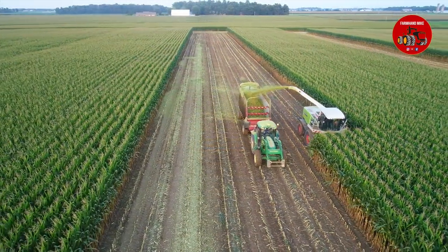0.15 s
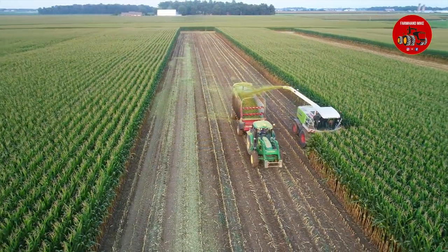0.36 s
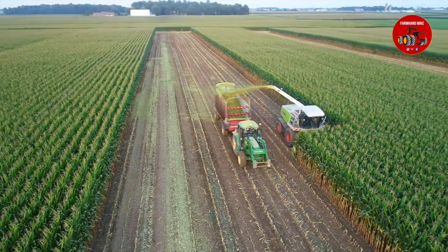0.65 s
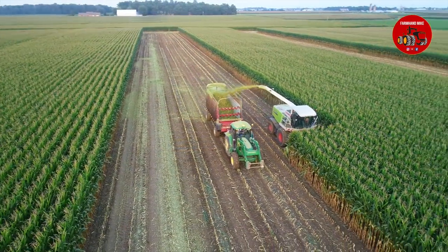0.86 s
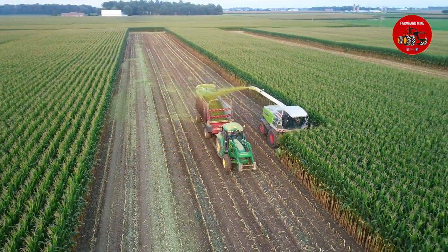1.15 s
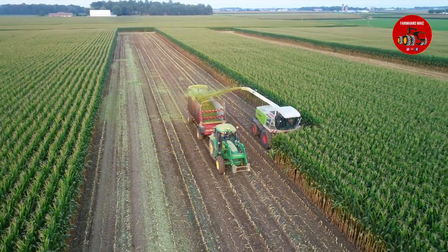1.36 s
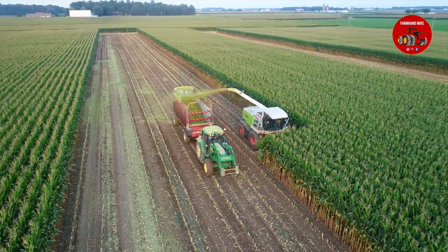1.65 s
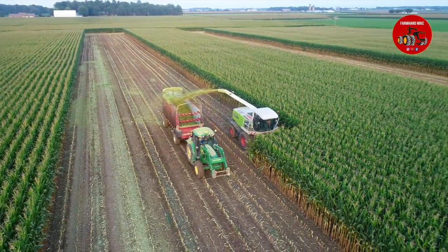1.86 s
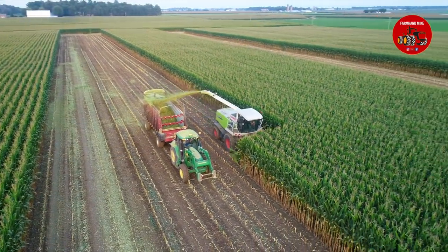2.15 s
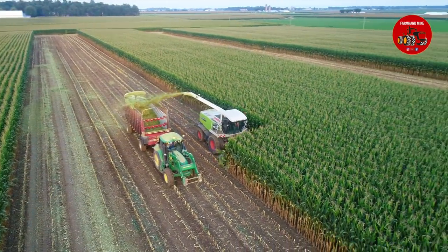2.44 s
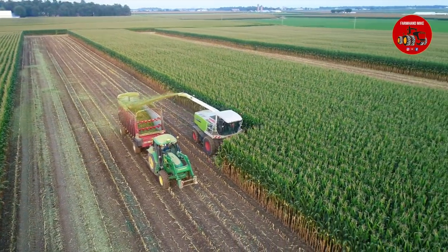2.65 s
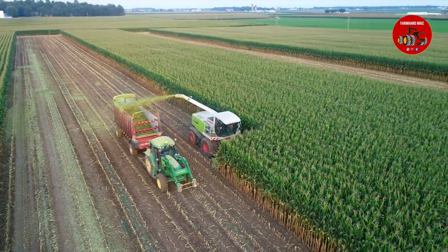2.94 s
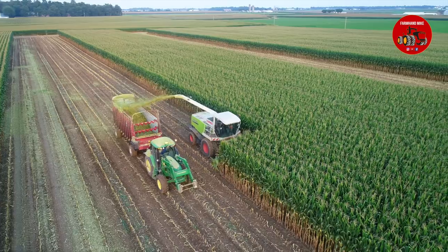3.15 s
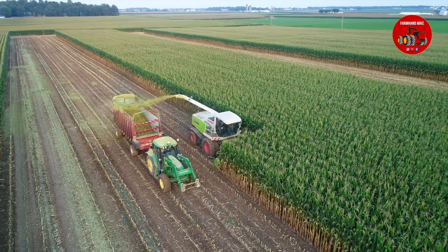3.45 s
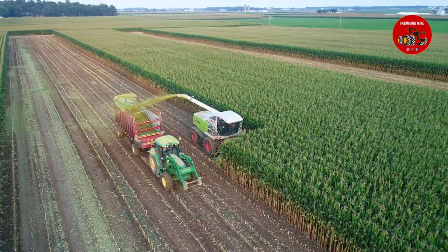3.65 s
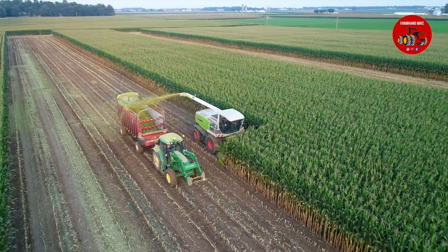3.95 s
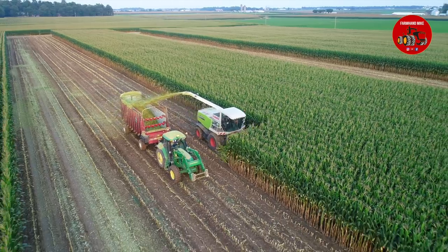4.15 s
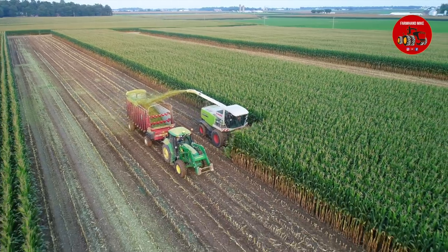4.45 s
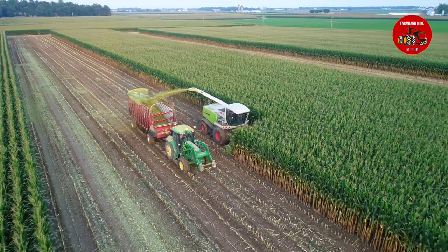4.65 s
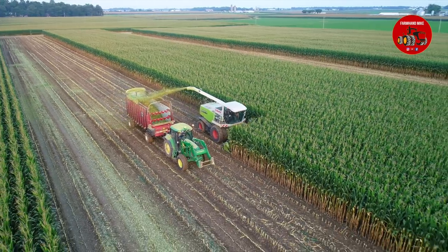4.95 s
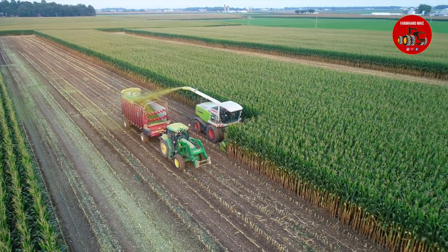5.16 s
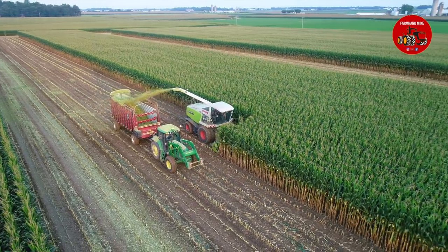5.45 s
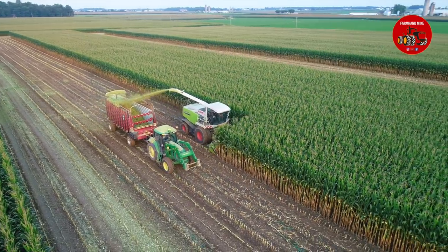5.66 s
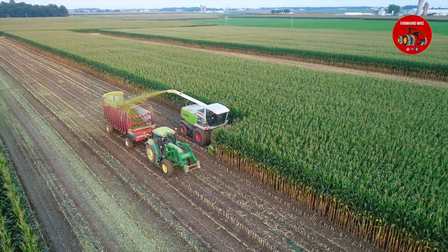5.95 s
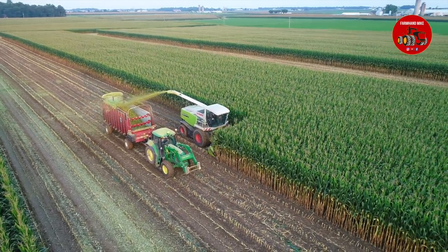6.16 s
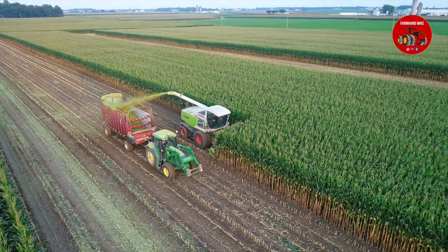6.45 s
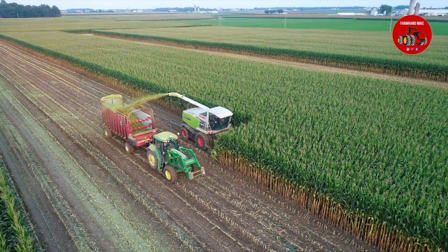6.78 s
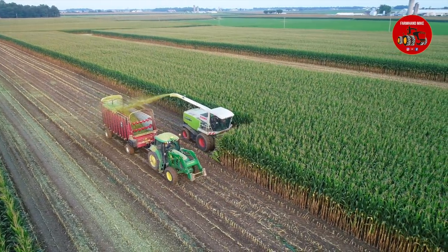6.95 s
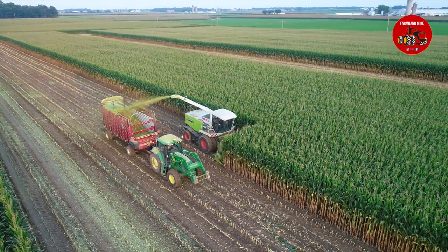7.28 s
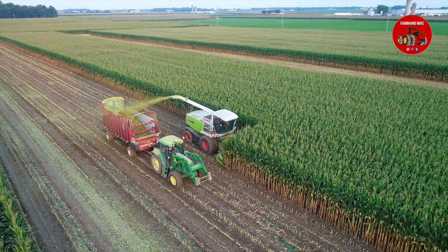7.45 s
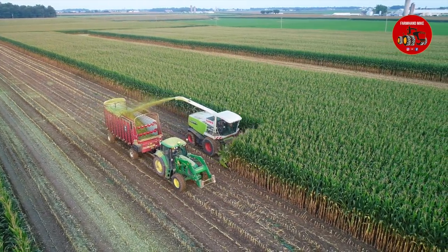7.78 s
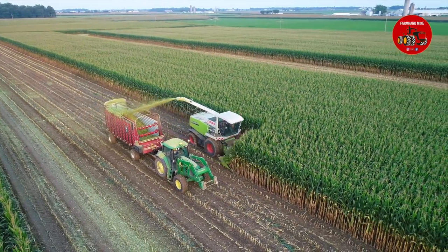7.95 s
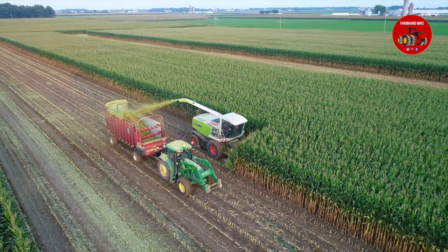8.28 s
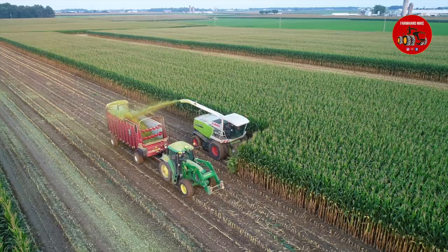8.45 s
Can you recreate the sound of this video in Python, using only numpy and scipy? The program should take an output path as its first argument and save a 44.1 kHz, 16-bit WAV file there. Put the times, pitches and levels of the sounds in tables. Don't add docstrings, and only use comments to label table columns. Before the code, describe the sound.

A forage harvester works through standing corn at steady load. Deep diesel beats and exhaust rumble sit beneath a thick hum from knife drum, blower and rollers, with rattling panels and broad fan roar. A bright rush of chopped leaves and stalks sweeps by early, then fades. Pitch wavers slightly and sinks near the end. Outdoor, dry, nearly mono, dense and slightly limited.

```python
import sys
import numpy as np
from scipy import signal
from scipy.fft import rfft, irfft, next_fast_len
from scipy.io import wavfile
from scipy.ndimage import uniform_filter1d, minimum_filter1d

SR = 44100
rng = np.random.default_rng(int(sys.argv[2]) if len(sys.argv) > 2 else 0)


def digitize_waveform(pressure):
    field = np.atleast_2d(pressure).T
    bounded = np.clip(field, -1, 1)
    quanta = np.round(bounded * 32767).astype(np.int16)
    wavfile.write(sys.argv[1], SR, quanta)


def ratio_of_db(decibels):
    return 10 ** (np.asarray(decibels, float) / 20)


N = 380141
SECONDS = np.arange(N) / SR


def rms_one(x):
    return x / np.sqrt(np.mean(x ** 2) + 1e-20)


def drift(rate):
    every = 80
    r = np.exp(-2 * np.pi * rate * every / SR)
    noise = rng.standard_normal(N // every + 1002)
    slow = signal.lfilter([1], [1, -2 * r, r * r], noise)[1000:]
    return np.interp(np.arange(N) / every, np.arange(len(slow)), rms_one(slow))


def coloured(x, points):
    size = next_fast_len(N)
    hz, db = np.transpose(sorted(points))
    bins = np.arange(1, size // 2 + 2) * SR / size
    gain_db = np.interp(np.log(bins), np.log(hz), db, -120, -120)
    return rms_one(irfft(rfft(x, size) * ratio_of_db(gain_db), size)[:N])


def hiss(points):
    return coloured(rng.standard_normal(N), points)


def patchy(low_hz, together, own_db, own_rate):
    size = next_fast_len(N)
    white = rfft(rng.standard_normal(size))
    place = 2 * np.log2(np.arange(1, len(white) + 1) * SR / size / low_hz)
    place = np.clip(place, 0, 7)
    out = 0
    for k in range(8):
        window = np.clip(1 - np.abs(place - k), 0, 1)
        flicker_db = together + own_db * drift(own_rate)
        out = out + irfft(white * window, size)[:N] * ratio_of_db(flicker_db)
    return out


def tone(turns, level_db, blur):
    phase = 2 * np.pi * (turns + rng.random()) + blur * drift(2.6)
    return np.sqrt(2) * ratio_of_db(level_db) * np.sin(phase)


def stack(turns, ratios, levels_db, flutter_db, blur):
    tones = 0
    for ratio, db in zip(ratios, levels_db):
        tones = tones + tone(ratio * turns, db + flutter_db * drift(5.1), blur * ratio)
    return tones


def swell(s, at, width, height):
    return height * np.exp(-.5 * ((s - at) / width) ** 2)


# (name, t/s, width/s, level/dB)
CROP_SWELLS = [("third", 3.0, .3, -1), ("third", 4.0, 0.13, 1.9), ("sixth", 1, 0.23, -2),
               ("sixth", 3, 0.16, -2), ("sixth", 5.4, .3, -2.4), ("ninth", 0.68, 0.38, -6),
               ("ninth", 2.7, 0.25, -4), ("ninth", 4.37, 0.15, -8), ("ninth", 5.5, 0.16, -3),
               ("twelfth", 1.2, .6, 5), ("twelfth", 6.6, .6, -12), ("pass", .25, .4, 4.8),
               ("pass", 1.2, .25, -3), ("pass", 5.61, 0.24, 3.5), ("pass", 6.5, 0.084, -6),
               ("pass", 3.56, 0.27, 1.5), ("octave", 1.47, 0.22, 8.9), ("octave", 0.34, 0.2, 6.5),
               ("octave", 7.64, .3, 6), ("edge", 1.32, 0.37, -8), ("edge", 7.77, 0.17, -9),
               ("edge", 5.75, 0.078, 4.8), ("ring", 8.35, 0.28, 5.5), ("blower", 1.95, 0.59, -5.5),
               ("blower", 3.6, 0.27, -2.5), ("blower", 4.7, 0.45, 3.8), ("feed", 1.23, 0.47, 8),
               ("feed", 5.4, 0.39, 3.5), ("header", 3.7, 0.24, -8), ("header", 6.4, 0.26, -8)]
# (name, t/s, width/s, level/dB)
GEAR_SWELLS = [("whine", .42, .06, 6), ("whine", .95, 0.17, 4), ("whine", 1.36, 0.093, 8.7),
               ("whine", 2.4, 0.17, 5), ("whine", 3.4, 0.14, 6.4), ("whine", 4.4, .1, 4.5),
               ("whine", 4.22, 0.052, 6), ("whine", 5.53, 0.21, 7.6), ("whine", 6.02, 0.055, 7),
               ("whine", 6.7, .1, 4), ("whine", 7.18, .06, 5)]


def levels(rows, excess_hz):
    ticks = np.arange(0, N + 400, 400)
    result = []
    for name, db, slope, wander_db in rows:
        swells = np.zeros(len(ticks))
        for who, at, width, gain_db in CROP_SWELLS + GEAR_SWELLS:
            if who == name:
                swells += swell(ticks / SR, at, width, gain_db)
        swell_db = np.interp(np.arange(N), ticks, swells)
        result.append(db + slope * excess_hz + wander_db * drift(2.5) + swell_db)
    return result


# (name, level/dB at rated speed, slope/dB per Hz of speed, wander/dB)
EXHAUST_TONES = [("third", -22.5, 0.33, 1), ("sixth", -21.5, -0.2, 1), ("ninth", -24.5, 0.01, 0.99),
                 ("twelfth", -32.5, 0.68, 2.4)]
EXHAUST_BEATS = [3, 6, 9, 12]
# (beats per engine cycle, level/dB)
WEAK_BEATS = [(4, -39), (7, -35), (10, -32), (18, -42), (26, -56), (30, -56.5)]


def engine(turns, excess_hz):
    cycles = .07019 * turns
    strong_db = levels(EXHAUST_TONES, excess_hz)
    strong = stack(cycles, EXHAUST_BEATS, strong_db, flutter_db=1.0, blur=0.01)
    return strong + stack(cycles, *np.transpose(WEAK_BEATS), flutter_db=4.0, blur=0.016)


# (name, level/dB at rated speed, slope/dB per Hz of speed, wander/dB)
DRUM_TONES = [("pass", -24.5, 0.061, 1), ("octave", -47.5, 0.31, 1.7), ("edge", -39, 0.5, 0.77),
              ("ring", -50.5, -0.017, 1.6)]
DRUM_GEARING = [1.001, 2.002, 3.003, 4.004]


def knife_drum(turns, excess_hz):
    return stack(turns, DRUM_GEARING, levels(DRUM_TONES, excess_hz), flutter_db=.5, blur=.1)


# (name, level/dB at rated speed, slope/dB per Hz of speed, wander/dB)
ROLLER_TONES = [("blower", -24.5, 0.34, 1.7), ("feed", -28.5, .01, 1.9), ("header", -27, -0.24, 1.5),
                ("cracker", -41.5, -0.62, 2.3)]
ROLLER_GEARING = [.6656, .4691, .5693, 1.3616]
SHAFT_GEARING = [.1897, .2344, .759, 1.1, 3.6436]
SHAFT_LEVELS = [-36.5, -36.5, -39.5, -45, -57]


def rollers(turns, excess_hz):
    loud = stack(turns, ROLLER_GEARING, levels(ROLLER_TONES, excess_hz), flutter_db=0.76, blur=0.17)
    return loud + stack(turns, SHAFT_GEARING, SHAFT_LEVELS, flutter_db=2.5, blur=0.48)


# (name, level/dB at rated speed, slope/dB per Hz of speed, wander/dB)
GEAR_TONES = [("whine", -46.5, .5, 0.81)]


def gearbox(turns, excess_hz):
    whine_db = levels(GEAR_TONES, excess_hz)[0] + 3 * drift(18.0)
    teeth_per_pass = 10.94
    return stack(turns, [teeth_per_pass], [whine_db], flutter_db=.5, blur=.2)


# (f/Hz, level/dB)
RUMBLE_COLOUR = [(18, -22), (30, -10), (60, -2), (108, -2), (200, -0.5), (262, -0.5), (300, -7), (330, -18),
                 (350, -24), (385, -20.5), (410, -17.5), (500, -20), (535, -26.5), (610, -33.5)]


def rumble(excess_hz):
    return ratio_of_db(-23 + 0.05 * excess_hz) * hiss(RUMBLE_COLOUR)


# (f/Hz, level/dB)
CASING_COLOUR = [(540, -40), (600, -8), (635, -3.5), (700, -2), (769, -1.5), (853, 1), (960, -3),
                 (1020, -8), (1120, -21.5), (1200, -10), (1290, -4), (1500, -8), (1950, -23)]


def casing(gust):
    return ratio_of_db(-36 + 0.75 * gust + 0.52 * drift(2.4)) * hiss(CASING_COLOUR)


# (f/Hz, level/dB)
ROAR_COLOUR = [(760, -43), (1300, -12), (1500, -3.5), (2380, -5), (2560, -7.5), (2730, -6), (3500, -11),
               (4550, -12.5), (6910, -9), (7350, -12), (9440, -32), (10200, -32), (10900, -31),
               (11500, -34), (15800, -52)]


def roar(excess_hz, gust):
    churn = patchy(1270, gust, own_db=0.23, own_rate=12.0)
    return ratio_of_db(-29.5 + 0.06 * excess_hz) * coloured(churn, ROAR_COLOUR)


# (f/Hz, level/dB)
STALK_COLOUR = [(1100, -19), (1500, -2), (2500, -0.5), (4000, 2), (5000, -5.5), (6000, -36)]
# (f/Hz, level/dB)
LEAF_HISS_COLOUR = [(3000, -30), (4000, -0.5), (5000, 3), (6200, 3.5), (7200, 2), (8500, -10.5),
                    (10000, -25), (11000, -50)]
# (closest t/s, level/dB there, loss/dB one second off)
STALKS_GO_BY = (0.51, -27.5, 3.5)
# (closest t/s, level/dB there, loss/dB one second off)
LEAVES_GO_BY = (0.59, -26, 13.4)
# (t/s, width/s, level/dB)
CROP_PUFFS = [(.06, 0.045, -33), (.215, .012, -26), (.27, .03, -29), (.35, .02, -28), (.615, 0.02, -25),
              (.64, .008, -24), (.82, 0.027, -30.5), (.98, .03, -33), (1.1, .02, -32), (1.24, 0.015, -27),
              (1.5, 0.055, -35)]
# (f/Hz, level/dB)
PUFF_HISS_COLOUR = [(3500, -23), (5000, -1), (6500, 4.5), (8000, -8.5), (9500, -21), (10500, -32),
                    (12000, -45)]


def passing_db(at, db, loss_db):
    return db - loss_db * (SECONDS - at) ** 2


def spray():
    grains = patchy(1200, .6 * drift(30.0), own_db=.9, own_rate=14.0)
    stalks = ratio_of_db(passing_db(*STALKS_GO_BY)) * coloured(grains, STALK_COLOUR)
    leaves = ratio_of_db(passing_db(*LEAVES_GO_BY)) * coloured(grains[::-1], LEAF_HISS_COLOUR)
    puffs = sum(swell(SECONDS, at, width, ratio_of_db(db)) for at, width, db in CROP_PUFFS)
    return ratio_of_db(.7 * drift(25.0)) * (stalks + leaves) + puffs * hiss(PUFF_HISS_COLOUR)


# (f/Hz, level/dB)
AIR_COLOUR = [(6060, -52), (10300, -16), (11600, -9), (12200, 3), (14100, -5), (15100, -4), (15800, -2)]
AIR_LEVELS = (-55.5, -53.5)


def air():
    own = np.array([hiss(AIR_COLOUR) * ratio_of_db(db + .6 * drift(4.0)) for db in AIR_LEVELS])
    opposed = ratio_of_db(-59) * hiss([(13500, -20), (14300, -2), (15800, 0)])
    return own + opposed * [[.6], [-1]]


# (start t/s, end t/s, level/dB)
PARTING_MOMENTS = [(0.492, .56, -49), (0.786, 0.957, -47), (1.467, 1.86, -56), (2.181, 2.385, -48.5),
                   (2.84, 2.88, -58), (3.494, 3.603, -49), (3.9, 4.014, -54), (4.71, 4.94, -51),
                   (5.225, 5.277, -56), (6.27, 6.39, -62), (7.41, 7.905, -55.5), (8.404, 8.57, -58)]
# (f/Hz, level/dB)
PARTING_SOUND = [(60, 9), (300, 4), (1000, 4), (3000, 0.5), (8000, -4), (9500, -10), (10500, -30)]


def partings():
    gate = sum(ratio_of_db(db) * ((SECONDS > start) & (SECONDS < end)) for start, end, db in PARTING_MOMENTS)
    patches = patchy(173, 1.3 * drift(5.2), own_db=6.5, own_rate=6.9)
    return gate * coloured(patches, PARTING_SOUND) * [[1], [-1]]


def turbo():
    s = SECONDS - 1.4
    hz = 10885 - 400 * np.exp(-s / .75)
    hz = hz + 46 * drift(55.0) + 12 * drift(2.0)
    level_db = -64.5 + 0.36 * s + 3 * drift(15.0)
    fade_in = np.clip(s / .3, 0, 1)
    return fade_in * tone(np.cumsum(hz) / SR, level_db, .3)


# (t/s, knife passes f/Hz)
DRIVE_SPEED = [(0, 236.4), (.4, 236.2), (1.0, 239.6), (1.4, 241.2), (1.7, 240), (2.2, 235.8), (2.6, 237.2),
               (3.3, 235), (4.0, 239), (4.55, 233.2), (4.95, 234.6), (5.5, 239), (6.1, 235.4), (6.7, 235.3),
               (7.35, 233.2), (7.75, 228.2), (8.2, 226.3), (8.62, 225.5)]


def scene():
    rated_hz, flywheel_s = 236.5, .2
    speed = np.interp(SECONDS, *np.transpose(DRIVE_SPEED))
    speed = uniform_filter1d(speed, size=int(flywheel_s * SR))
    turns = np.cumsum(speed) / SR
    excess_hz = speed - rated_hz
    gust = 0.19 * drift(17.0) + 0.55 * drift(20.0)
    driven = engine(turns, excess_hz) + knife_drum(turns, excess_hz)
    driven = driven + rollers(turns, excess_hz) + gearbox(turns, excess_hz)
    noises = rumble(excess_hz) + casing(gust) + roar(excess_hz, gust)
    close = np.clip((N - np.arange(N)) / (.004 * SR), 0, 1)
    return close * (driven + noises + spray() + air() + partings() + turbo())


def top_cut(x):
    return signal.sosfilt(signal.butter(12, 15900, fs=SR, output="sos"), x)


def record(dry):
    window = 331
    peak = -minimum_filter1d(-np.abs(dry[0]), size=window)
    peak_db = 20 * np.log10(peak + 1e-9)
    duck_db = uniform_filter1d(np.minimum(0, -7.5 - peak_db) * 0.51, size=window)
    return top_cut(dry * ratio_of_db(duck_db + 0.5))


dry = scene()
out = record(dry)
digitize_waveform(out)
```